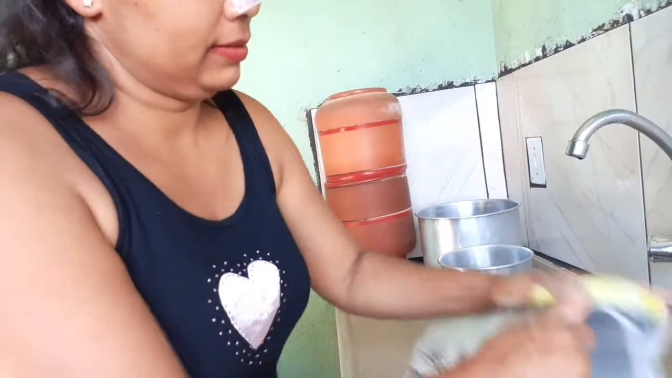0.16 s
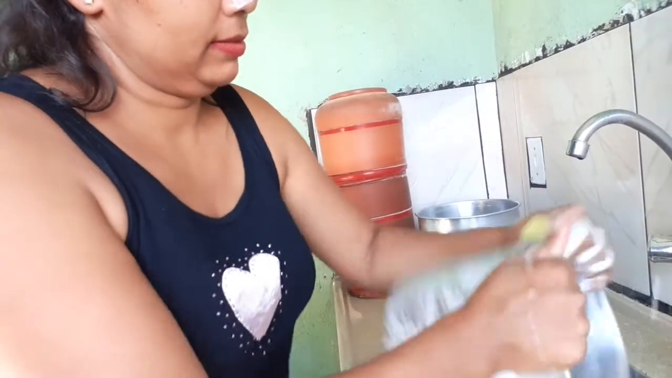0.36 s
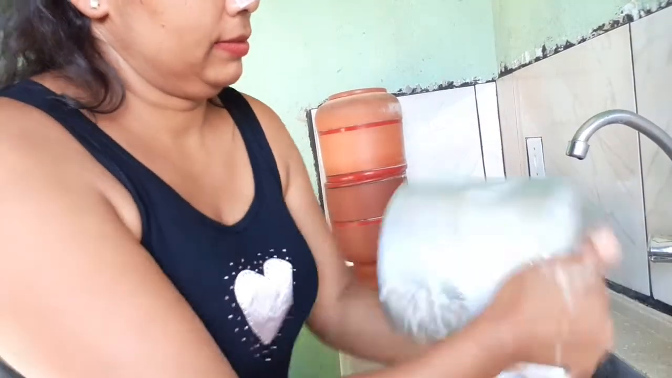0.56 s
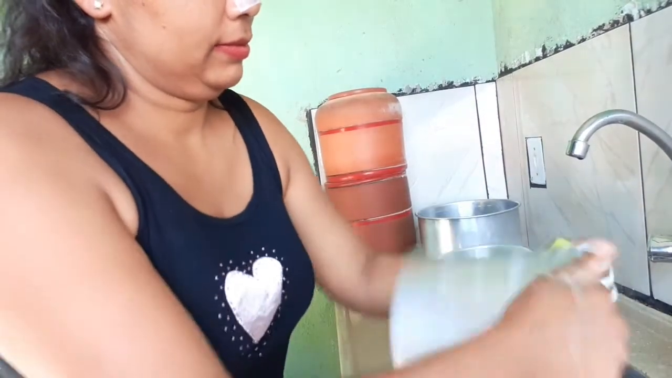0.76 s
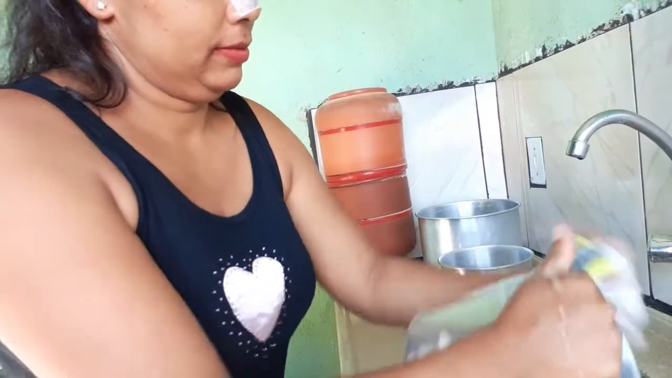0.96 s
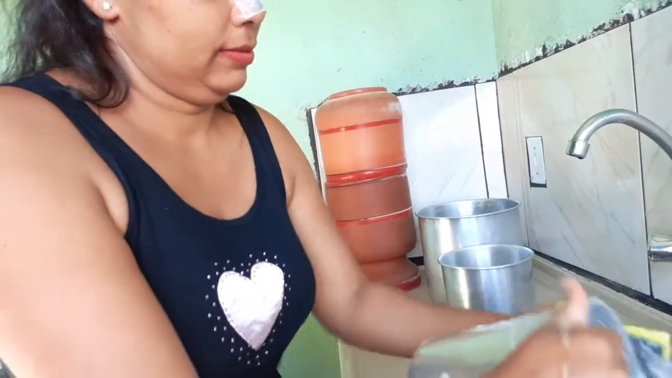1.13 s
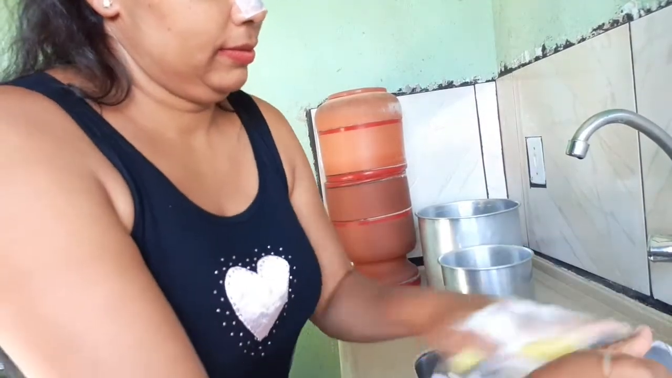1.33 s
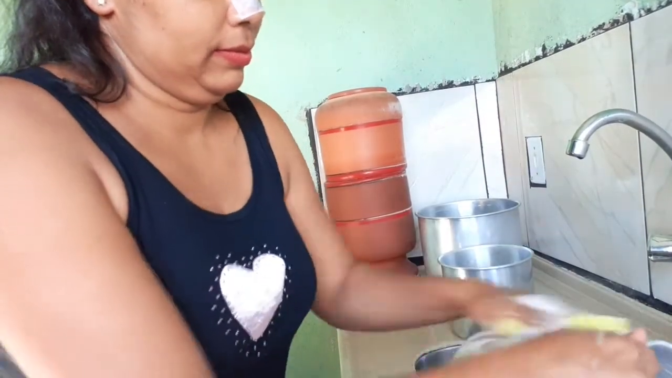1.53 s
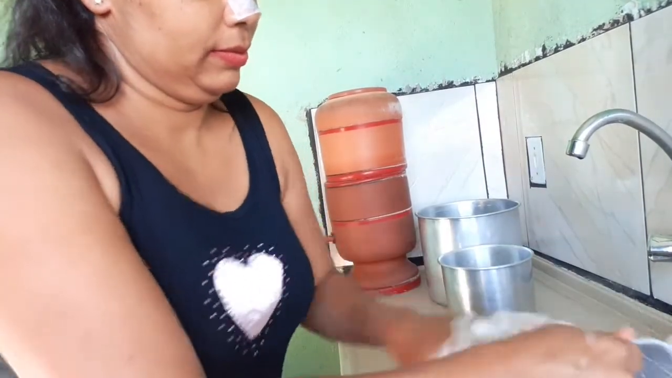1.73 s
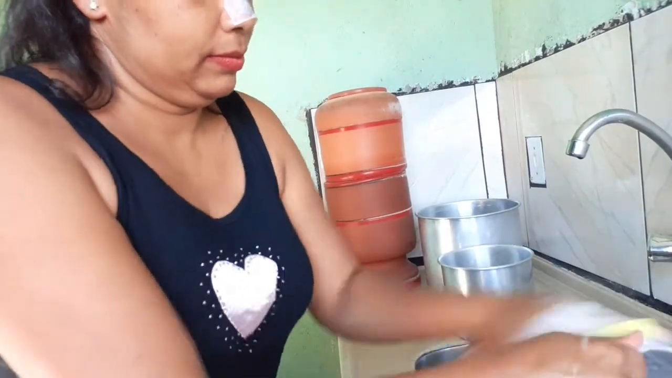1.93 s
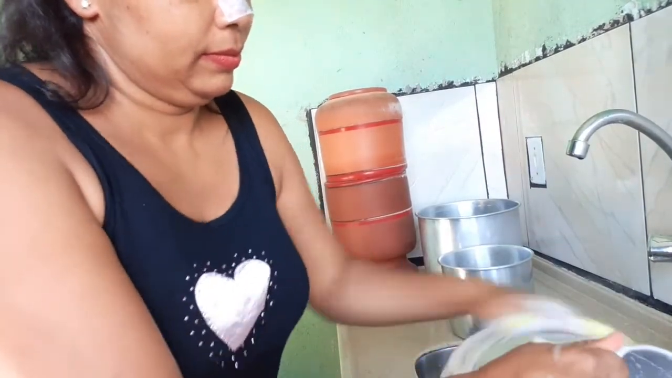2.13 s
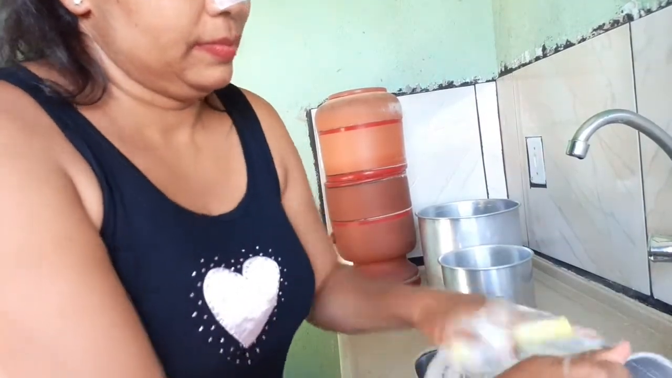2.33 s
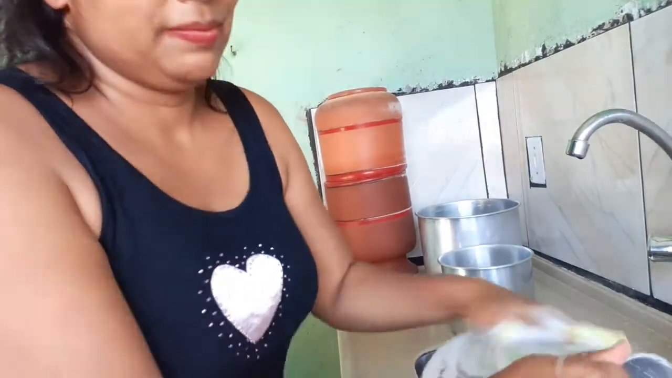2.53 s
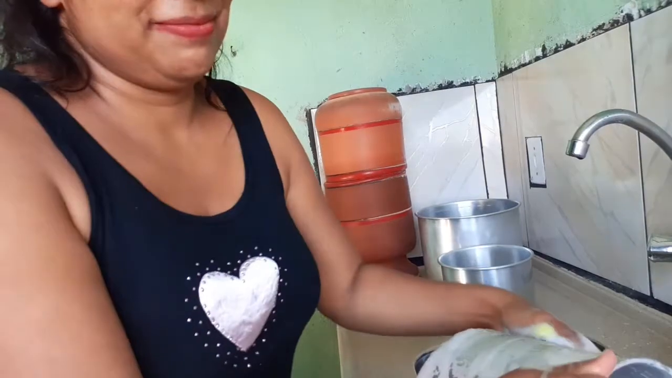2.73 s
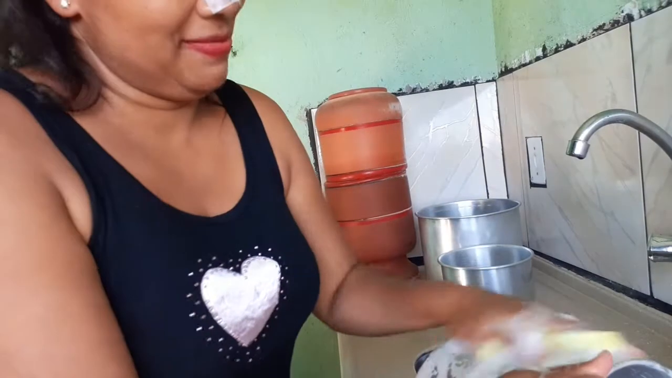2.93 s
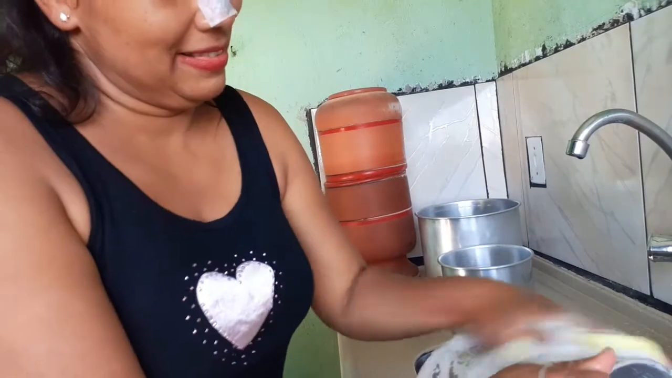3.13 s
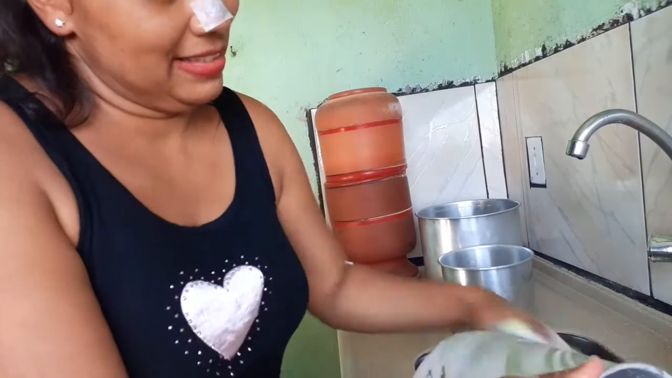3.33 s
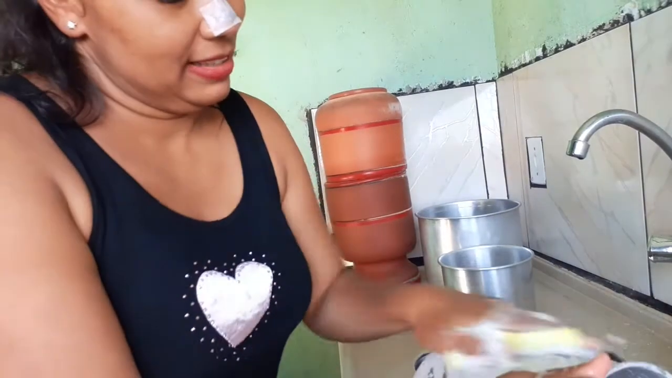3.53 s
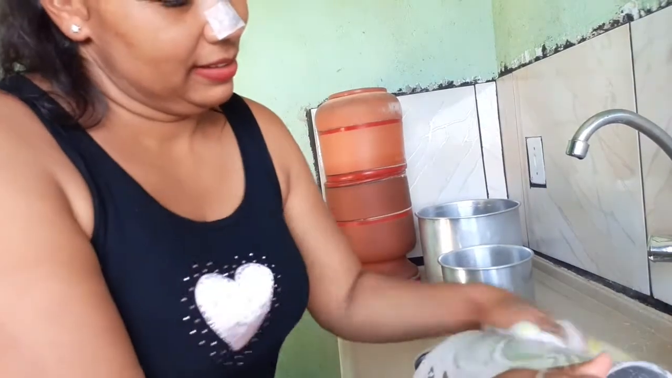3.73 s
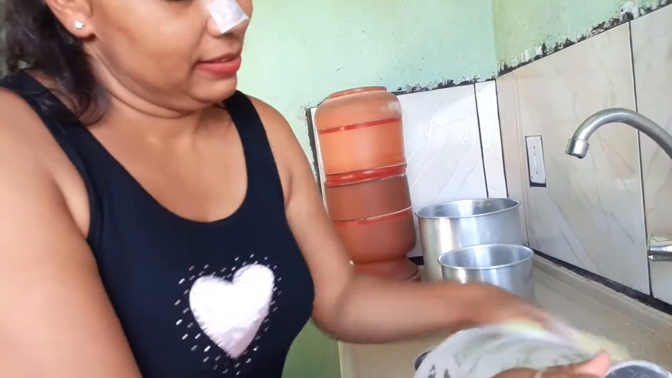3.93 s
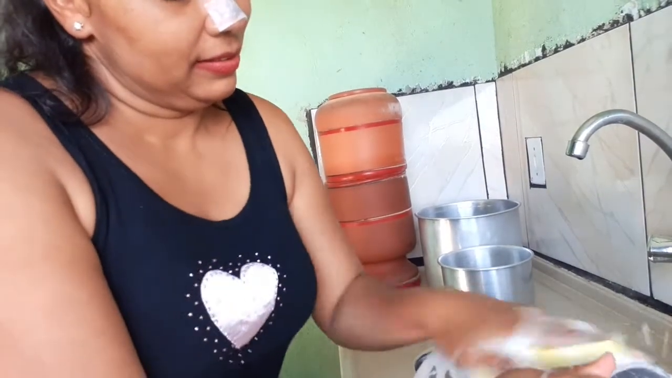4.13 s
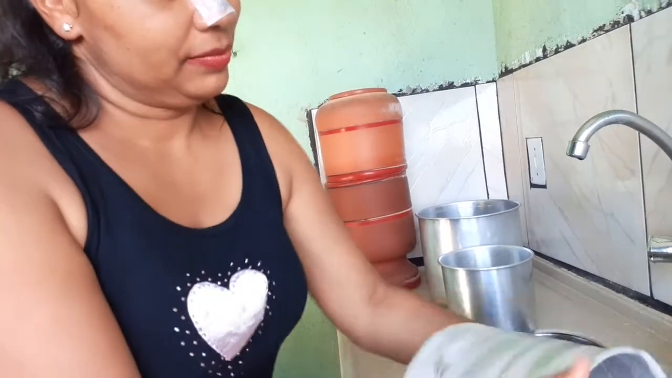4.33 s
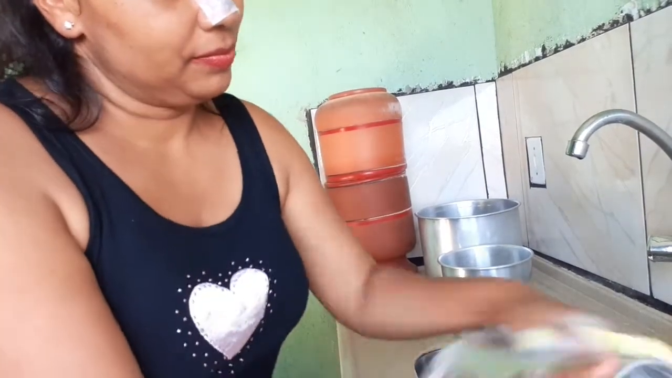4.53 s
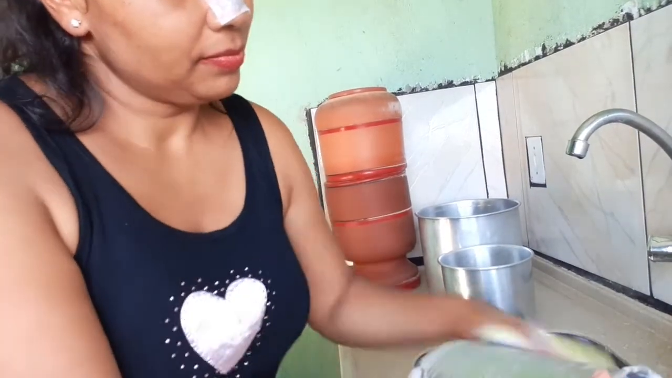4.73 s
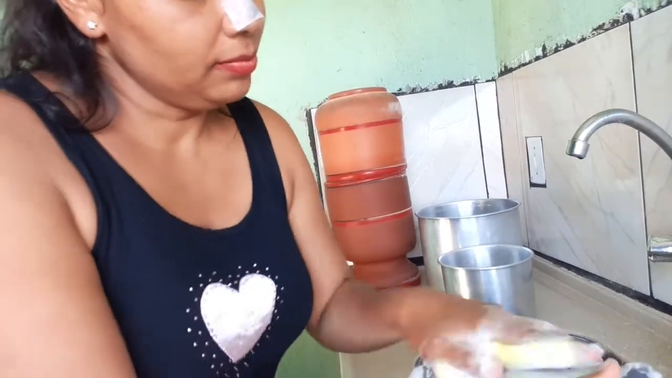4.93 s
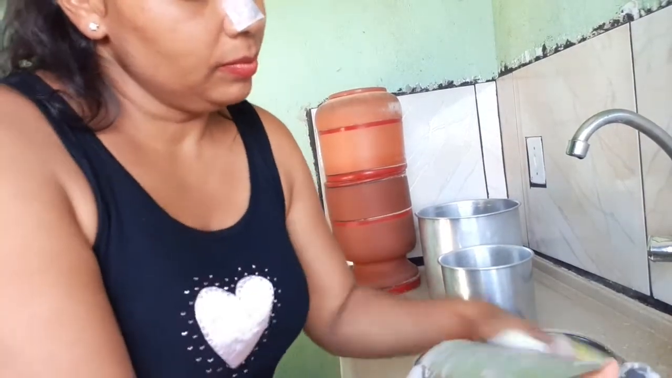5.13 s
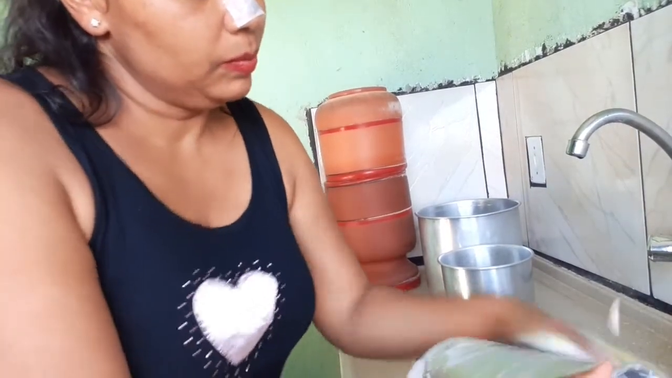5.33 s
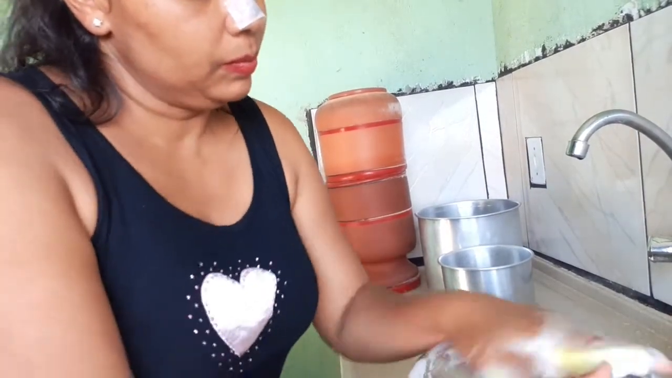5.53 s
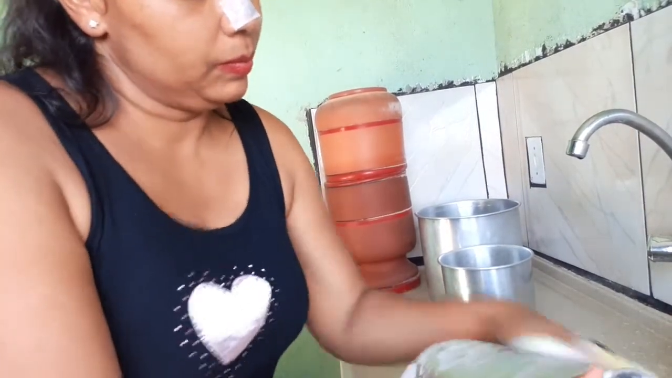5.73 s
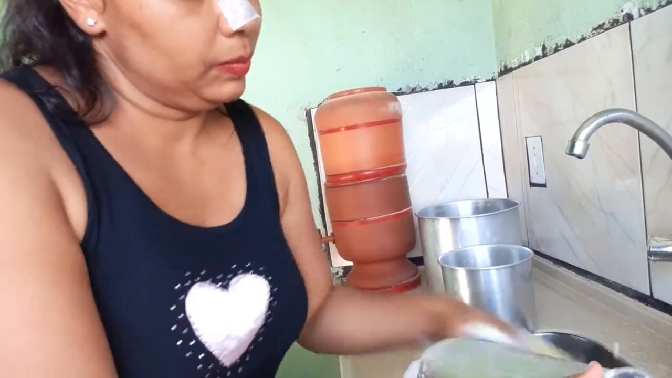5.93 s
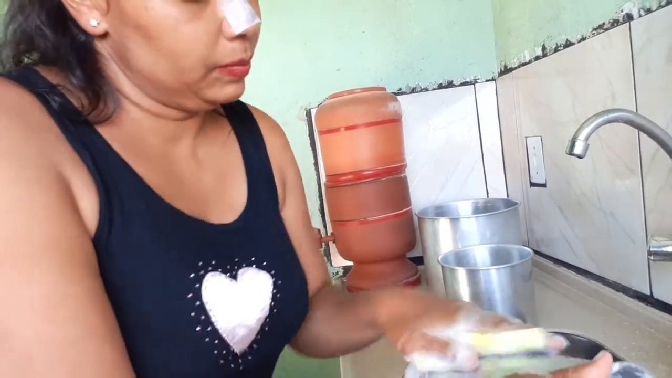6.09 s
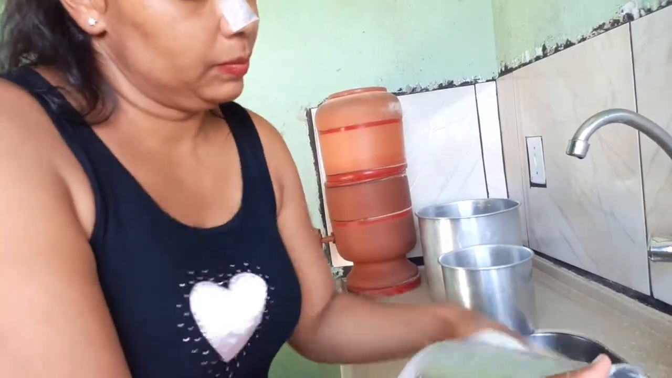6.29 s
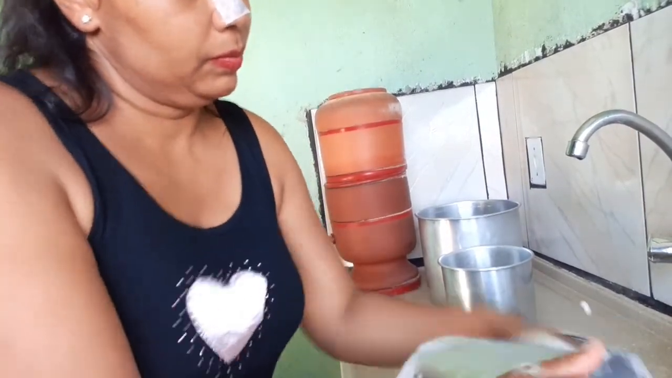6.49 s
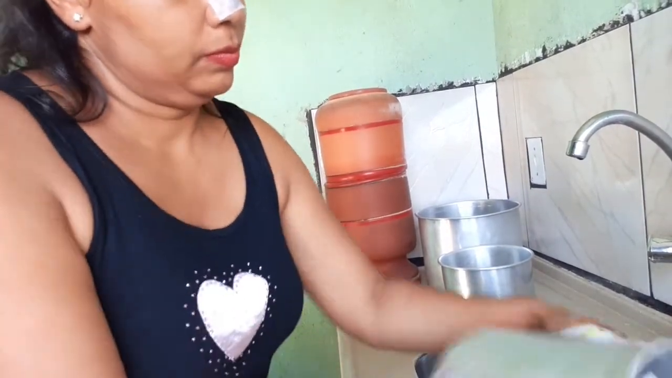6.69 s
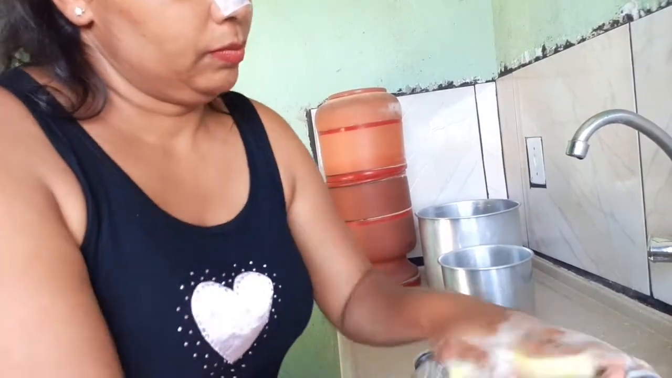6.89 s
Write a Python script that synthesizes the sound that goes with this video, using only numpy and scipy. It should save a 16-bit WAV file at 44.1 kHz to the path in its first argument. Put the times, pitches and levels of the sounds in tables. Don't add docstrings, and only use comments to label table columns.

```python
import sys
import numpy as np
from scipy import signal
from scipy.fft import rfft, irfft, next_fast_len
from scipy.io import wavfile
from scipy.ndimage import uniform_filter1d

SR = 44100
rng = np.random.default_rng(int(sys.argv[2]) if len(sys.argv) > 2 else 0)


def wav_out(sig):
    wavfile.write(sys.argv[1], SR, np.round(np.clip(np.atleast_2d(sig).T, -1, 1) * 32767).astype(np.int16))


def decibels_to_gain(level_db):
    exponent = np.asarray(level_db, float) / 20
    return 10 ** exponent


N = 306617
T = np.arange(N) / SR
SET_DOWN_S = 1.128


def unit(x):
    return x / np.sqrt(np.mean(x ** 2))


def fade_out(t, t60):
    return np.exp(-np.log(1000) * t / t60)


def colour(x, points):
    hz, db = np.transpose(points)
    size = next_fast_len(N)
    f = np.arange(size // 2 + 1) * SR / size + 1
    gain = decibels_to_gain(np.interp(np.log(f), np.log(hz), db))
    return irfft(rfft(x, size) * gain, size)[..., :N]


def peak(x, hz, width_hz):
    return signal.lfilter(*signal.iirpeak(hz, hz / width_hz, fs=SR), x)


def walk(rate):
    k = int(SR / rate)
    held = np.repeat(rng.standard_normal(N // k + 1), k)
    return uniform_filter1d(held, k)[:N]


def pair(alike):
    common, own = rng.standard_normal(N), rng.standard_normal((2, N))
    return np.sqrt(alike) * common + np.sqrt(1 - alike) * own


def add(out, s, x):
    i = int(s * SR)
    out[i:i + len(x)] += x[:N - i]


def ring(modes, rise, phases):
    t = T[:int(SR * 0.6), None]
    hz, db, t60 = np.transpose(modes)
    swell = (1 - np.exp(-t * hz / max(rise, 0.05))) ** 2
    fade = fade_out(t, np.minimum(t60, 1.5))
    sines = np.sin(2 * np.pi * (hz * t + phases))
    return (decibels_to_gain(db) * swell * fade * sines).sum(axis=1)


# frequency in Hz, level in dB per Hz.
ROOM_TONE = [(200, -8), (450, -4.5), (1000, 1.5), (2000, -10.5), (4000, -13.5), (6500, -15.5), (9500, -7),
             (15500, -14)]


def room_tone():
    return unit(colour(pair(0.16), ROOM_TONE)) * decibels_to_gain(-66.5 - 3.5)


def kitchen(x):
    t60_s, build_s, level_db = 0.42, 0.0052, -17.5
    t = T[:SR // 2]
    tail = rng.standard_normal((2, len(t))) * fade_out(t, t60_s) * (1 - np.exp(-t / build_s))
    tail = signal.lfilter(*signal.butter(1, 1500, fs=SR), tail)
    tail = signal.lfilter(*signal.butter(2, 280, "high", fs=SR), tail)
    tail = tail / np.sqrt((tail ** 2).sum(axis=1))[:, None]
    return decibels_to_gain(level_db) * signal.fftconvolve(x[None], tail, axes=1)[:, :N]


# frequency in Hz, level in dB, t60 in seconds.
BASIN = [(65.3, 3, 0.99), (75.7, 2.5, .7), (108, -0.5, 0.45), (135.5, 6, 0.11), (161.3, -6.5, 0.37),
         (194, 5, 0.44), (219, -3.5, .3), (245.2, -1, 0.34), (359.5, -2, 0.13), (428, -1.5, 0.2),
         (491, -20.5, .25), (533, -15.5, .25)]
# start in seconds, rumble in dB, fade t60 in seconds,
# centre of the drag in Hz.
DRAGS = [(.0, -54, 1, 192), (.075, -46, .7, 100), (.715, -48.5, 0.37, 150), (.97, -59, .4, 250),
         (1.135, -38, 0.81, 151), (1.81, -46, 0.5, 240), (1.99, -51.5, 0.48, 65.6), (2.65, -64.5, 1.7, 100),
         (2.8, -61, 1.17, 74.6), (3.1, -63, 0.63, 66.7), (3.61, -62.5, 1.2, 70), (4.24, -60, 0.6, 81.7),
         (4.42, -44.5, .6, 110), (4.58, -55, 0.64, 110), (4.86, -58.5, 0.77, 75), (5.12, -52.5, 0.7, 71.7),
         (5.32, -54, 2, 250), (5.43, -57.5, 0.82, 70), (5.56, -60.5, 0.9, 68.4), (6.01, -55.5, 1.3, 65),
         (6.15, -61, 0.35, 218), (6.32, -65, 0.93, 70), (6.52, -66.5, 2.1, 61)]


def rumble():
    rise_s, resting_db, held_up_db = 0.016, -72.5, 6
    focus_db = 9.5
    grind = rng.standard_normal(N)
    s, db, fade, centre_hz = np.transpose(DRAGS)
    coarse = T[::64]
    since = np.maximum(coarse - s[:, None], 0)
    swells = (1 - np.exp(-since / rise_s)) * fade_out(since, fade[:, None])
    resting = decibels_to_gain(resting_db - np.where(coarse < SET_DOWN_S, held_up_db, 0))
    out = np.zeros(N)
    for hz, mode_db, t60 in BASIN:
        drag_gain = decibels_to_gain(db - focus_db * np.log2(hz / centre_hz) ** 2)
        stir = np.interp(T, coarse, drag_gain @ swells + resting)
        mode = unit(peak(grind, hz, 1.7 / t60 + 4))
        out += stir * decibels_to_gain(mode_db + 4.5 * walk(8)) * mode
    return decibels_to_gain(-9) * out


# start in seconds, peak in dB, centre of the push in Hz.
THUDS = [(0.009, -45.5, 194), (0.077, -41, 190), (0.107, -39, 183), (0.249, -46, 194), (0.32, -45, 203),
         (0.545, -42, 194), (0.621, -42, 210), (0.647, -46.5, 112), (0.799, -51.5, 117),
         (1.815, -38.5, 208), (1.848, -45, 260), (1.958, -44.5, 183), (2.051, -49, 197),
         (2.653, -53.5, 129), (2.8, -53.5, 194), (2.944, -45.5, 115), (3.268, -52.5, 196),
         (3.622, -54.5, 91.5), (3.959, -56, 72.7), (4.175, -48.5, 194), (4.231, -51, 255),
         (4.839, -50.5, 191), (4.987, -46.5, 196), (5.137, -57, 63.6), (5.428, -53.5, 202),
         (5.568, -49, 61.9), (5.702, -50, 118), (6.026, -48, 64.3), (6.156, -45, 194), (6.311, -47.5, 65)]


def thuds():
    ring_share = 0.726
    out = np.zeros(N)
    hz, db, t60 = np.transpose(BASIN)
    for s, peak_db, centre_hz in THUDS:
        spot, phases = rng.random((2, len(hz)))
        near_db = db - 9 * np.log2(hz / centre_hz) ** 2 - 6 * spot
        thud = ring(np.transpose([hz, near_db, ring_share * t60]), 0.43, phases)
        add(out, s - 0.004, decibels_to_gain(peak_db) * thud / np.abs(thud).max())
    return out


def burst(hz, width_hz, t60, rise_s):
    t = T[:SR // 2]
    x = peak(peak(rng.standard_normal(SR // 2), hz, width_hz), hz, width_hz)
    x = x * (1 - np.exp(-t / rise_s)) * fade_out(t, t60)
    return x / np.abs(x).max()


# start in seconds, peak in dB, centre in Hz, width in Hz,
# t60 in seconds.
TICKS = [(0.261, -38.5, 1990, 2000, 0.062), (0.7105, -27.5, 1700, 2387, 0.03),
         (0.712, -37, 5500, 8810, 0.03), (.865, -45, 5000, 2500, .015), (.865, -50, 9900, 3000, 0.022),
         (0.886, -56, 8950, 2500, .015), (.917, -48, 9600, 2460, 0.019), (1.069, -38.5, 1500, 1200, 0.036),
         (1.1288, -30, 1500, 1170, 0.074), (1.129, -30.5, 2290, 719, 0.029), (1.186, -32, 703, 700, 0.099),
         (1.258, -45, 4000, 1500, 0.035), (1.275, -24, 4220, 2800, 0.093), (1.275, -40, 2700, 900, 0.023),
         (1.274, -37.5, 1780, 700, 0.043), (1.275, -35, 5370, 2500, 0.079), (1.293, -41, 3960, 2200, 0.27),
         (6.759, -38.5, 2410, 3950, 0.025), (6.76, -44, 7000, 6030, .02), (6.76, -41.5, 4370, 6000, 0.56)]


def ticks():
    out = np.zeros(N)
    for s, db, hz, width_hz, t60 in TICKS:
        add(out, s, decibels_to_gain(db) * burst(hz, width_hz, t60, 0.000264))
    return out


def push(hz):
    turn = T[:SR // 50] * hz - 1.25
    return np.cos(2 * np.pi * turn) * np.exp(-(turn / np.where(turn < 0, 0.6, 1.5)) ** 2)


# frequency in Hz, level in dB, t60 in seconds.
TAP = [(129, -4.5, 0.18), (202, -4.5, 0.091), (250, -18.5, 0.16), (483, -4.5, 0.052), (642, -8, 0.0945),
       (820, -26.5, 0.12), (1270, -7.5, 0.17), (1530, -20.5, 0.29), (1735, -5, 0.02), (1990, -16.5, 0.0393)]
# frequency in Hz, t60 in seconds, level in dB for the hard,
# the middle and the soft knock.
STRUCK = [(74, 1, -32.5, -11.5, -12), (112, .6, -17.5, -2, -3), (140.9, 0.31, -19.5, -10, -6.5),
          (161, 0.35, -13.5, -1.5, -3.5), (190.7, .22, -4, -2.5, -14), (234.3, 0.36, -5.5, -5.5, -7.5),
          (255.6, .38, -6, 1.5, -10.5), (288.3, 0.48, -11.5, -26, -31), (334, 0.4, -9.5, -2.5, -43),
          (377.7, 0.52, -12.5, -10, -44), (418, 0.33, -2, -4.5, -32), (469, 0.22, -24.5, -5, -45),
          (493.4, 0.41, -6.5, -7.5, -41), (554.4, 0.18, 3.5, -5, -50), (603, 0.42, -8, -13.5, -50),
          (632.6, 0.33, -12.5, -20.5, -43), (690, 0.19, -17.5, -22, -57), (790, 0.25, -10, -25, -60),
          (863, 0.4, -14, -31, -60), (954, 0.34, -14.5, -32, -60), (1018, 0.33, -29, -42, -60),
          (1319, 0.37, -23.5, -37, -60), (1410, 0.2, -23.5, -40, -60), (1680, 0.3, -28, -48, -60)]
# start in seconds, peak in dB, rise in cycles, close neighbours of each mode in dB,
# first push in dB, its frequency in Hz.
KNOCKS = [
    (0.709, -28, 0.22, -8, -29.5, 839),
    (1.128, -3.5, 0.6, -4, -4.5, 650),
    (4.4055, -18, 0.56, -7, -19.5, 270),
    (6.7619, -27, 0.51, -17, -40, 169),
]
NEIGHBOURS = (-2.2, -1, 1, 2.2)


def knocks():
    split = 0.022
    neighbour_lag = 3.5
    out = np.zeros(N)
    hz, t60, *places = np.transpose(STRUCK)
    bodies = [np.array(TAP)] + [np.transpose([hz, db, t60]) for db in places]
    for (s, db, rise, near_db, push_db, push_hz), modes in zip(KNOCKS, bodies):
        chance = rng.random((4, 2, len(modes)))
        blow = ring(modes, rise, np.zeros(len(modes)))
        for side, (gap, phases) in zip(NEIGHBOURS, chance):
            stretch = 1 + split * (side + gap - 0.5)
            detune = np.transpose([stretch, np.ones_like(gap), 0.9 + 0.429 * phases])
            blow = blow + decibels_to_gain(near_db) * ring(modes * detune, neighbour_lag * rise, phases)
        add(out, s, decibels_to_gain(db) * blow / np.abs(blow).max())
        add(out, s, decibels_to_gain(push_db) * push(push_hz))
    return out


# time in seconds, sag in dB.
TURNS = [(.095, 4.5), (2.656, 9), (2.799, 8), (2.943, 6.5), (3.089, 9), (3.235, 1), (3.374, 5),
         (3.52, -2.5), (3.677, 4), (3.891, 3.5), (4.041, 2.5), (4.176, 2), (4.834, 5), (4.995, 13),
         (5.138, 7), (5.283, 3), (5.428, 8), (5.567, 10), (5.717, 8), (5.87, 0), (6.026, 7), (6.161, 8),
         (6.301, 6)]


def hand_speed():
    turn_half_s = 0.012
    coarse = T[::16]
    sag_db = sum(db * np.exp(-np.abs(coarse - s) / turn_half_s) for s, db in TURNS)
    return np.interp(T, coarse, decibels_to_gain(-sag_db))


# off in seconds, on again in seconds, drop in dB, landing in seconds.
LIFTS = [
    (0.307, 0.305, 6.5, .07),
    (0.67, 0.694, 8.5, 0.0087),
    (0.822, 0.937, 12.5, 0.053),
    (1.098, 1.107, 2.5, 0.022),
    (4.422, 4.492, 14.5, 0.097),
    (6.684, 6.762, 13, 0.035),
]


def lift_db():
    ease_s = 0.056
    total = np.zeros(N)
    for off, on, db, land in LIFTS:
        corners = np.cumsum([off - ease_s, ease_s, max(on - off, 0), land])
        total += np.interp(T, corners, [0, db, db, 0])
    return total


def wandering_modes(x, modes, depth_db, rate):
    out = 0
    for hz, width_hz, air_db, down_db in modes:
        level_db = np.where(T < SET_DOWN_S, air_db, down_db) + depth_db * walk(rate)
        out = out + decibels_to_gain(level_db) * unit(peak(x, hz, width_hz))
    return out


# frequency in Hz, level in dB per Hz.
WALL = [(150, -9), (250, -13.5), (287, -31.5), (413, -3), (690, -11.5), (1130, -3.5), (1280, -4.5),
        (1500, -5), (2950, -2.5), (5000, -2.5), (6500, -4.5), (11000, -120)]
# frequency in Hz, width in Hz, level in dB in the air, level in dB set down.
WALL_MODES = [(403, 43, -4, -18.5), (427, 120, -17, -19), (584.4, 71, -9, -6), (916.6, 31, -15, -4),
              (1270.5, 31, 0.5, -3), (1400, 30, -7, -11.5), (2013, 74, -7, -9)]


def wall(db, speed):
    drag = pair(0.5) * decibels_to_gain(1.3 * walk(60))
    modes = wandering_modes(drag, WALL_MODES, 1.775, 14)
    return (unit(colour(drag, WALL)) + decibels_to_gain(-10.5) * modes) * decibels_to_gain(db - 2.0) * speed ** 0.3


# frequency in Hz, level in dB per Hz.
FIBRES = [(880, -30.5), (1500, -26.5), (1900, -21), (2010, -33.5), (2210, -12.5), (2970, -11.5),
          (4010, -9.5), (4510, -7.5), (5070, -6.5), (7130, -5.5), (9100, -2), (15000, -6), (15400, -4)]
# frequency in Hz, width in Hz, level in dB in the air, level in dB set down.
RIM = [(2914, 240, -33.5, -26), (4483, 160, -21.5, -27.5), (8905, 540, -17, -12.5), (8390, 190, -24, -26),
       (9600, 230, -20.5, -17), (10320, 380, -23, -20.5), (11460, 160, -20.5, -19.5),
       (13500, 500, -22.5, -27)]


def fibres(db, top_db, speed):
    catches = pair(0.039) * decibels_to_gain(1.1 * walk(900) + 0.49 * walk(70))
    hiss = unit(colour(catches, FIBRES)) + wandering_modes(catches, RIM, 1.94, 8.9)
    low = colour(hiss, [(2500, -26), (7000, -39)])
    top = colour(hiss, [(9000, -16), (13000, -4)])
    low_change = decibels_to_gain(1.8 * walk(9)) - 1
    top_change = decibels_to_gain(top_db - np.median(top_db)) - 1
    return (hiss + low * low_change + top * top_change) * decibels_to_gain(db + 1.5) * speed


# time in seconds, fibre hiss in dB.
EFFORT = [(0, -49), (.25, -50.5), (.44, -45.5), (.62, -44.5), (.72, -55.5), (1.01, -50), (1.14, -57),
          (1.37, -52.5), (1.76, -52.5), (2.47, -52), (2.58, -49), (3.3, -48), (4.3, -50), (4.6, -51.5),
          (4.9, -48), (6.52, -49.5), (6.8, -56.5), (6.92, -52.5)]
# time in seconds, level in dB above the hiss.
GRIP = [(0, -18.5), (.2, -4), (.8, 4.5), (1.25, -1.5), (1.6, -10), (1.84, -3.5), (2.3, -14.5), (2.95, -9),
        (3.2, -15.5), (3.45, -9.5), (4.0, -10.5), (4.3, -6), (4.9, -10.5), (5.3, -8.5), (5.65, -4),
        (5.85, -10), (6.05, -10), (6.6, -13), (6.95, -6)]


def scoured_pot():
    effort_db = np.interp(T, *np.transpose(EFFORT))
    grip_db = np.interp(T, *np.transpose(GRIP))
    lift, speed = lift_db(), hand_speed()
    top_db = -0.13 * grip_db - 0.39 * lift
    hiss = fibres(effort_db - lift, top_db, speed)
    ringing = wall(effort_db + grip_db - 0.95 * lift, speed)
    return (hiss + ringing) * decibels_to_gain(np.array([[2.4], [3.6]]))


def scene():
    left_lag = 4
    basin = rumble() + thuds() + ticks() + knocks()
    near_left = colour(basin, [(150, -2.5), (280, -2.1), (1000, -1.6)])
    near_right = colour(basin, [(150, 2.5), (280, 1.4), (1000, 0)])
    left, right = room_tone() + kitchen(basin) + np.array([near_left, near_right]) + scoured_pot()
    return np.array([np.roll(left, left_lag), right])


def top_cut(x):
    return signal.sosfilt(signal.butter(12, 16740, fs=SR, output="sos"), x)


def record(dry):
    x = signal.sosfilt(signal.butter(4, 50, "high", fs=SR, output="sos"), dry)
    mix = signal.sosfilt(signal.ellip(14, 0.2, 70, 15430, fs=SR, output="sos"), x)
    return top_cut(mix)


dry = scene()
out = record(dry)
wav_out(out)
```